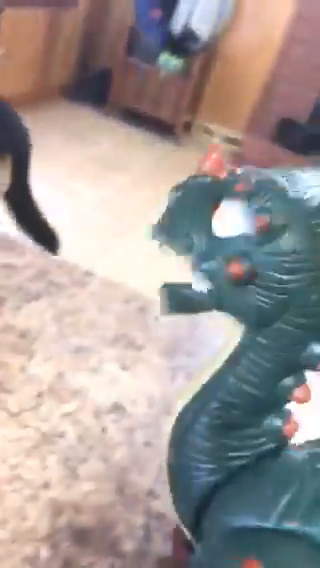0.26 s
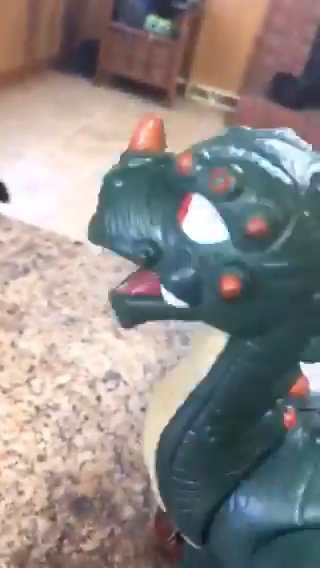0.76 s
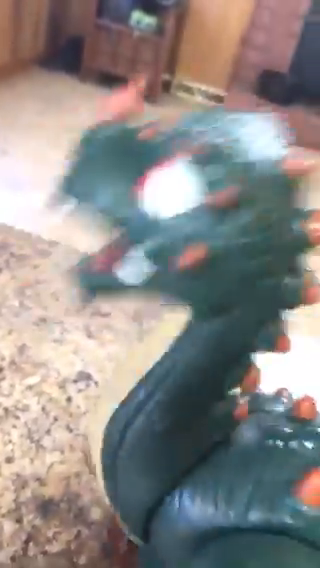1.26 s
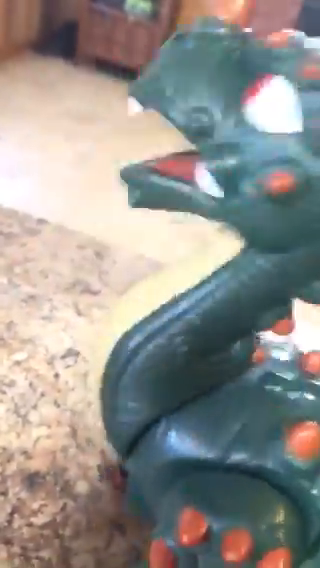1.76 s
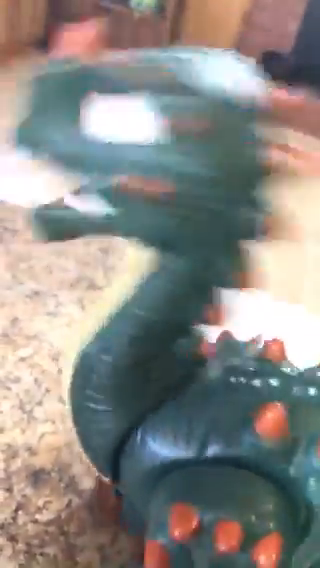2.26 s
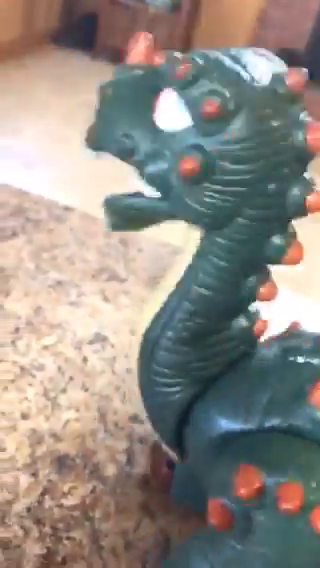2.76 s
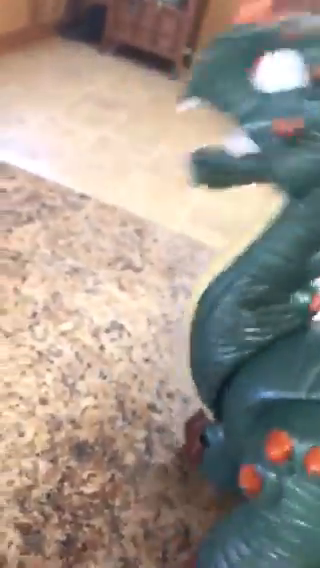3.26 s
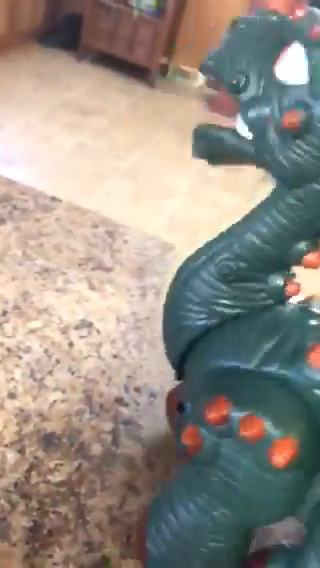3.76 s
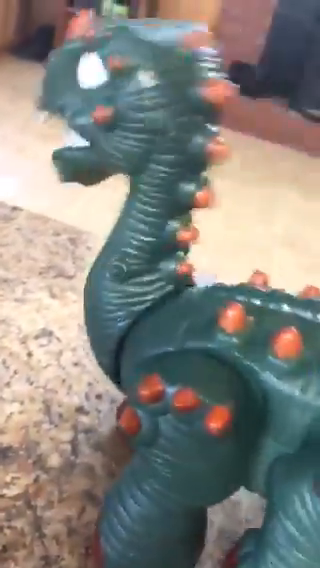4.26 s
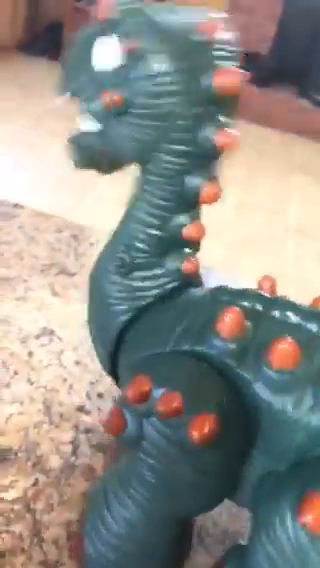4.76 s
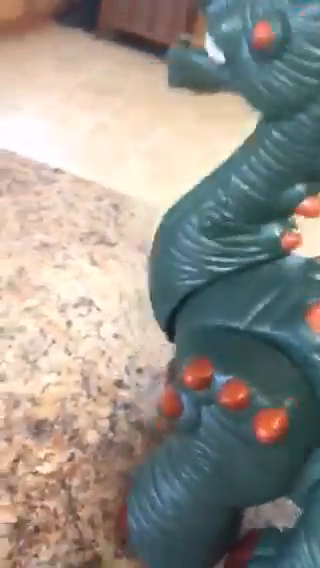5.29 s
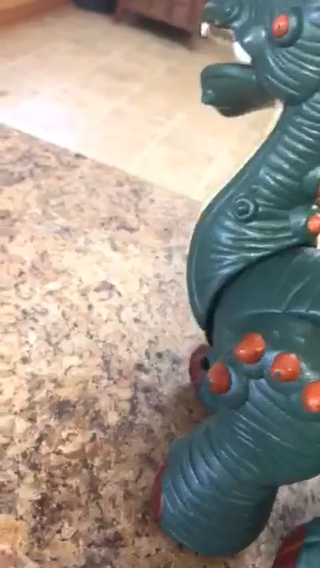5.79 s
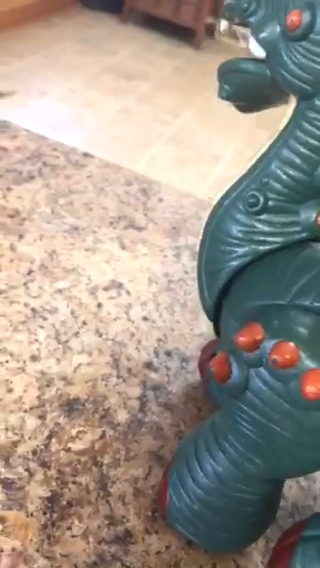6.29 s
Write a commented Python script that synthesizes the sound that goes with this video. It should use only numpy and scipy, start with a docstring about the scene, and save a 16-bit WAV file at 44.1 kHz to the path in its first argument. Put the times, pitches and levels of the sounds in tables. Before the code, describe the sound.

Close, irregular plastic clacking and joint clicking from a toy dinosaur stepping along a kitchen counter, ending in quiet hiss.

```python
"""A hollow plastic walking toy clacks along a stone kitchen counter, close to a phone.
Each step is a foot blow followed by bounces, joint clicks and faint chance ticks; the shell rings briefly,
the kitchen answers, a soft thud sounds far off, and the phone's gain recovers in the quiet."""
import sys
import numpy as np
from scipy import signal
from scipy.fft import rfft, irfft, next_fast_len
from scipy.io import wavfile
from scipy.ndimage import uniform_filter1d

SR = 44100
rng = np.random.default_rng(int(sys.argv[2]) if len(sys.argv) > 2 else 0)


def bounce(signal):
    """Save signal as a 16-bit WAV file at the path given by the first command-line argument."""
    frames = np.transpose(np.atleast_2d(signal))
    limited = np.clip(frames, -1, 1)
    pcm = np.round(limited * 32767).astype(np.int16)
    wavfile.write(sys.argv[1], SR, pcm)


N = 287973

# feet and limbs meeting counter and shell: (s, clack dB, snap dB over clack, hollow knock dB over clack)
CONTACTS = [(0.078, -26, -3, -7.5), (0.1252, -14.5, -2.5, 3.5), (.146, -13, -2.5, 0), (0.181, -29, 3, -18),
            (.325, -13.5, -12, -6), (.333, -9.5, -3.5, -1.5), (.353, -13.5, 1, -5.5), (0.537, -11, -2, 0), (.556, -15.5, -3.5, -0.5),
            (0.5891, -24, -4, -17), (0.6358, -27.5, -5, -4), (0.667, -30, -5, 4), (.6903, -39.5, -9, 9),
            (0.7395, -39, 1.5, 8.5), (0.7924, -8, -2, -2), (.8124, -23, 11, 2.5), (.846, -35, -6, 10), (.9353, -24, -6, 7.5),
            (.9781, -25.5, -5, 4.5), (1.0173, -15.5, -2, -6.5), (1.1098, -31.5, -3, -2), (1.1413, -28.5, -2, -3),
            (1.191, -9.5, -2, -3.5), (1.2221, -21.5, 3.5, 1.5), (1.3343, -38.5, 9, 10), (1.3404, -19, 0.5, 5.5),
            (1.3811, -20.5, -1.5, 6), (1.441, -24.5, -15, -18), (1.5523, -15, -16, -5), (1.561, -11.5, -4, -4),
            (1.754, -14, -2.5, 5.5), (1.787, -19.5, -3, 0), (1.807, -27.5, 7, -20), (1.828, -25, -10, -11),
            (1.93, -30.5, -7, 4), (1.939, -13.5, -6.5, -7.5), (1.9454, -19.5, -3, -.5), (1.972, -22.5, -0.5, 1),
            (2.154, -11.5, -1.5, 3), (2.1661, -13.5, -11, -3), (2.183, -19, -2, 0.5), (2.349, -16, -1.5, -4.5),
            (2.5448, -13, -2, 4.5), (2.5786, -20.5, -1.5, -5), (2.613, -26.5, -7, -21), (2.7279, -27.5, -16, -7),
            (2.7414, -20.5, -1.5, 0.5), (2.79, -31.5, 2.5, 0), (2.805, -31, -8, -12), (2.85, -41.5, -2, 10),
            (2.9353, -13.5, -1.5, 4), (2.9666, -23, -10, -5), (3.0047, -22, 7, -20), (3.1145, -56, 19, -17),
            (3.15, -25.5, -21, -4.5), (3.1669, -21, -5.5, 1), (3.1959, -33, -4, 4), (3.3561, -16, -3.5, 3.5),
            (3.402, -24.5, -9, 5.5), (3.442, -24, -8, -27), (3.534, -30, -11, -28), (3.5593, -18, -6.5, -1.5),
            (3.6162, -51, 15, 14), (3.7695, -14, -1, 3.5), (3.815, -27, -2, 3), (3.8515, -29.5, -15, -2), (3.9531, -30, -16, 3.5),
            (3.974, -33.5, -4, 5.5), (3.989, -32, -1.5, -2), (4.0358, -45.5, -19, 18), (4.1226, -37, -6, -6),
            (4.1425, -39.5, 0, 4), (4.2738, -21.5, -14, 0.5), (4.3458, -36.5, -4, -3), (4.5272, -12.5, -2.5, 4),
            (4.5455, -19, -6, 3), (4.7148, -22, 0, -6), (4.725, -12, -5.5, -2), (4.7887, -30, -1, -18),
            (4.891, -16.5, -2.5, 6.5), (4.91, -24.5, 7.5, -6), (4.9175, -19, -20, -10), (5.0547, -44, 8, -14),
            (5.2545, -40.5, 1, -1), (5.2854, -25.5, -12, 5), (5.3376, -26.5, -11, -9), (5.3728, -44, 14.5, -10),
            (5.4609, -22, -10, -5), (5.4688, -33, -5, 12), (5.499, -22, -8, -14), (5.811, -44, -43, 10)]
# hollow body of the toy: (Hz, width Hz, dB)
HOLLOW = [(546.5, 37, -6.5), (686.5, 31.5, 5), (784, 52, 2.5), (987, 70, 2.5), (1158, 86, -3), (1360, 150, -9)]
# stiff walls of the shell: (Hz, width Hz, dB)
WALLS = [(1384, 156, -5), (1830, 156, -2), (2247, 176, -2.5), (2905, 266, -2), (3410, 480, -3.5), (4200, 580, -3), (4910, 710, -12.5)]
JOINT = [(2880, 260, -3), (3160, 220, 0)]  # a small hard joint: (Hz, width Hz, dB)  # fixed
# thin edges that snap: (Hz, width Hz, dB)
EDGES = [(5540, 2000, -7.5), (6610, 780, -3.5), (8730, 2100, -10.5), (9520, 650, -11), (11410, 580, -14.5), (15300, 3900, -22.5)]
KITCHEN = [(100, 0.6), (400, 0.36), (1000, 0.54), (3000, 0.42), (7000, 0.36), (15000, 0.23)]  # (Hz, t60 s)
THUD = [(6.11, -36), (6.159, -47), (6.482, -52)]  # soft far steps: (s, dB)
THUD_MODES = [(149.5, 26, 17.5), (185, 48, 18), (220, 38, 19.5)]  # (Hz, width Hz, dB)
QUIET = [(15, -48), (25, -14), (64, -3), (170, -0.5), (363, -5.5), (439, -9.5), (591, -13), (659, -12), (1370, -18.5),
         (3250, -15.5), (5000, -17), (7110, -17.5), (10400, -22.5), (12500, -19.5), (16000, -24)]  # room hum and microphone hiss: (Hz, dB per Hz)
QUIET_DB = -48.5
LEAD = SR // 10  # samples sounding before the start  # fixed
TOP_HZ = 15900  # fixed
# the counter and cabinet under the feet: (Hz, width Hz, dB)
COUNTER = [(46, 38, -23), (77.7, 7.5, -12.5), (155.3, 43, -10.5), (271.3, 61, -6), (340.3, 28.6, -4), (380.4, 27, -0.5), (456.3, 74, -5)]
FAR = [(100, -1.5), (300, -7), (520, -1), (740, -7), (1050, -10), (1500, -5.5), (2400, -9.5), (3150, -8.5), (4200, -11), (7000, -13), (15000, -16)]  # strength of the kitchen's answer: (Hz, dB)
HUM = (67, 11, -59.5)  # a wavering appliance hum: (Hz, width Hz, dB)
BELLY = [(700.2, 56, -5.5), (772.5, 20, 0.5)]  # air in the belly, which lingers: (Hz, width Hz, dB)
CONTACT_RING_DB = -11  # the joint rings faintly under every clack
# the hard joint clicking as a leg swings: (s, ring dB, clack dB over ring, snap dB over ring)
JOINT_CLICKS = [(-.06, -12, 2, -1.5), (0.0883, -22, -5, -20), (0.0973, -23, -12, -26), (0.2193, -20, -4, -6.5),
                (.3064, -10.5, -5.5, 0), (0.7709, -7.5, -3.5, -3), (1.1644, -14, 0.5, 1), (1.533, -18, -1.5, 1.5),
                (1.5928, -27, 5.5, 6), (1.7804, -25, 3, -1), (1.9123, -14, -5.5, 1), (2.201, -19, -22, -14),
                (2.309, -15, -9.5, -1.5), (2.3408, -23.5, 7, 2.5), (2.4972, -41, 0, -12), (2.6474, -33, -8, -16),
                (2.7052, -13, -11, -6.5), (2.9991, -35, -17, 7), (3.1282, -19.5, -0.5, -1), (3.5059, -22, -1.5, -2.5),
                (3.5948, -22.5, -0.5, -14), (3.7585, -20.5, -9, -7), (3.9019, -27, -8, -6.5), (4.1703, -23, 1, -11),
                (4.207, -24, -1, -0.5), (4.5099, -20, -5, -7), (4.521, -12.5, -5, -23), (4.5536, -13.5, -10, -4),
                (4.6258, -25.5, -12, 0.5), (4.6929, -11, -5, -4), (4.7456, -18.5, -1, 5), (5.0642, -26.5, -13, -29),
                (5.2663, -32.5, -6, -15), (5.3158, -30, -13, -19), (5.4224, -8, -10, -8.5)]
CLICK_KNOCK_DB = -3.5  # hollow knock over the clack of a joint click
WALKING = [(0, 4.35), (4.55, 5.05), (5.25, 5.6)]  # the toy is in motion: (from s, to s)  # fixed
FAINT_DB, FAINT_DB_PER_S, FAINT_SPREAD_DB = -37, 0, 4.5  # chance ticks of the moving toy, at a steady average level with random spread
FAINT_MS = None
CHATTER_MS, CHATTER_MS_PER_KNOCK_DB, HEAVY_KNOCK_DB = 7.23, 0.05, -13.5  # a heavier knock chatters longer
PINGS = [(2.6135, -30), (2.805, -38), (3.4422, -19), (4.2085, -21)]  # a small part pings high: (s, dB)
PING_MODES = [(4570, 350, -3), (4880, 370, -2)]  # (Hz, width Hz, dB)


def amp(db):
    """Decibels to gain."""
    return 10 ** (np.asarray(db) / 20)


def along(points, hz):
    """(Hz, value) points on a log axis."""
    f, v = np.transpose(points)
    return np.interp(np.log(hz + 1), np.log(f + 1), v)


def filtered(x, response):
    """x times a complex response of frequency."""
    m = next_fast_len(x.shape[-1] + 8192)  # fixed
    return irfft(rfft(x, m) * response(np.fft.rfftfreq(m, 1 / SR)), m)[..., :x.shape[-1]]


def struck(force, modes, db, scatter_db, detune):
    """Rows of force through resonances, whose strengths and pitches differ from blow to blow."""
    f = np.fft.rfftfreq(force.shape[1], 1 / SR)
    chance = rng.standard_normal((len(force), len(modes), 2))
    body = 0
    for k, (hz, width, level_db) in enumerate(modes):
        c = hz * (1 + detune * chance[:, k, :1])
        body = body + (-1) ** k * amp(level_db + scatter_db * chance[:, k, 1:]) * 1j * f * width / (c * c - f * f + 1j * f * width)
    ring = irfft(rfft(force) * body)
    strongest = uniform_filter1d(ring ** 2, size=100, axis=1).max(1)
    return ring * (amp(db) / np.sqrt(strongest))[:, None]


def chatter(length_ms, spikes, spiky_db, rise_ms, edge):
    """Force of each contact: a burst of tiny rebounds of uneven size that holds, then dies away."""
    t_ms = np.arange(spikes.shape[1]) / SR * 1000  # fixed
    fade = np.exp(-(t_ms / np.clip(length_ms, .3, 20)[:, None]) ** edge) * (1 - np.exp(-t_ms / rise_ms))
    return rng.standard_normal(spikes.shape) * amp(spiky_db * spikes) * fade


def toy(rows):
    """Rows of body sound and of joint ring, one for each contact; all parts feel the same rebounds."""
    _, db, snap_db, knock_db, ring_db = np.transpose(rows)
    length_ms = np.maximum(CHATTER_MS + CHATTER_MS_PER_KNOCK_DB * (knock_db - HEAVY_KNOCK_DB), 2.5)
    spikes = uniform_filter1d(rng.standard_normal((len(db), 8192)), size=36, axis=1) * 6  # fixed
    force = lambda share, spiky_db, rise_ms=.15: chatter(share * length_ms, spikes, spiky_db, rise_ms, edge=0.79)
    clack = struck(blow(force(0.79, spiky_db=4), sharp=0.32), WALLS, db - 1.5, scatter_db=2.5, detune=0.036)
    ring = struck(blow(force(.35, spiky_db=4), sharp=1.3), JOINT, ring_db - 1.5, scatter_db=3, detune=.03)  # fixed
    snap = struck(blow(force(0.83, spiky_db=6.5), sharp=0.29), EDGES, snap_db, scatter_db=1.5, detune=0.046)
    knock = struck(blow(force(.55, spiky_db=4), sharp=2), HOLLOW, knock_db, scatter_db=1.5, detune=.012)  # fixed
    boom = struck(blow(force(1.73, spiky_db=2.0, rise_ms=0.99), sharp=0.95), COUNTER, knock_db - 11, scatter_db=1.5, detune=0.014)
    rattle = struck(loose(count=len(db), per_s=120, fade_ms=21.8, tick_ms=2.15), WALLS + EDGES, db - 5.5, scatter_db=6.5, detune=0.071)
    belly = struck(force(1.3, spiky_db=2.0, rise_ms=1.4), BELLY, knock_db - 13.5, scatter_db=7, detune=0.016)
    return clack + snap + knock + boom + belly + rattle, ring


def kitchen(count):
    """Reverberant tails of energy 1; each frequency dies at its own speed."""
    hz, t, z = signal.stft(rng.standard_normal((count, SR // 2)), SR, nperseg=256)
    tails = signal.istft(z * amp(-60 * t / along(KITCHEN, hz)[:, None]), SR, nperseg=256)[1]
    tails = tails * (1 - np.exp(-np.arange(tails.shape[1]) / (0.00067 * SR)))  # echoes take a moment to build up
    return tails / np.linalg.norm(tails, axis=1, keepdims=True)


def walk():
    """The toy moves as it walks, so successive contacts excite the room in different ways."""
    places = np.zeros((12, LEAD + N + 8192))  # fixed
    near = np.zeros(places.shape[1])
    rows = contacts()
    for k, (row, body, ring) in enumerate(zip(rows, *toy(rows))):
        at = slice(LEAD + round(row[0] * SR), LEAD + round(row[0] * SR) + len(body))
        near[at] += body + ring
        places[k % len(places), at] += body + amp(-9) * ring  # the joint faces the phone and sends little to the walls  # fixed
    wet = signal.fftconvolve(places, kitchen(count=len(places)), axes=1).sum(0)
    return near[LEAD:LEAD + N] + filtered(wet[LEAD:LEAD + N], lambda hz: amp(along(FAR, hz)))


def thuds():
    """Soft pushes on the floor ring its low modes."""
    t = np.arange(16384) / SR  # fixed
    push = np.exp(-t / 0.037) * uniform_filter1d(rng.standard_normal((len(THUD), len(t))), size=110, axis=1)
    out = np.zeros(N + len(t))
    for (s, _), sound in zip(THUD, struck(push, THUD_MODES, np.transpose(THUD)[1], scatter_db=0.0, detune=.012)):
        out[round(s * SR):][:len(t)] += sound
    return out[:N]


def quiet():
    """Steady rumble and hiss, with a narrow hum."""
    noise = filtered(rng.standard_normal(N), lambda hz: amp(along(QUIET, hz)))
    centre_hz, width_hz, hum_db = HUM
    hum = filtered(rng.standard_normal(N), lambda hz: np.exp(-((hz - centre_hz) / width_hz) ** 2))
    return amp(QUIET_DB) * noise / noise.std() + amp(hum_db) * hum / hum.std()


def loose(count, per_s, fade_ms, tick_ms):
    """Force of loose parts that go on ticking at random, ever weaker, after a contact."""
    t_ms = np.arange(8192) / SR * 1000  # fixed
    chance = rng.random((count, 2, len(t_ms)))
    starts = (chance[:, 0] < per_s / SR) * chance[:, 1] * np.exp(-t_ms / fade_ms)
    starts[:, 0] = 1
    ticks = signal.lfilter([1], [1, -np.exp(-1000 / (tick_ms * SR))], starts)
    return ticks * rng.standard_normal(ticks.shape)


def blow(force, sharp):
    """Chatter led by one clean impulse, which strikes every mode alike."""
    first = np.arange(force.shape[1]) == 8  # fixed
    return force / np.linalg.norm(force, axis=1, keepdims=True) + sharp * first


def contacts():
    """All contacts as rows (s, clack dB, snap dB, knock dB, ring dB)."""
    rows = [(s, db, db + snap, db + knock, db + CONTACT_RING_DB) for s, db, snap, knock in CONTACTS]
    rows += [(s, db + clack, db + snap, db + clack + CLICK_KNOCK_DB, db) for s, db, clack, snap in JOINT_CLICKS]
    return np.array(sorted(rows) + faint(per_s=6))  # fixed


def faint(per_s):
    """Small chance ticks while the toy moves, each with its own mix of parts."""
    rows = []
    for start, end in WALKING:
        for slot in np.arange(start, end - .5 / per_s, 1 / per_s):
            s = slot + rng.random() / per_s
            clack, snap, knock, ring = FAINT_DB + FAINT_DB_PER_S * s + FAINT_SPREAD_DB * rng.standard_normal(4)
            rows.append((s, clack, snap - 6, knock + 3, ring - 5))
    return rows


def pings():
    """Short bright rings of a small stiff part."""
    t = np.arange(2048) / SR  # fixed
    force = blow(rng.standard_normal((len(PINGS), len(t))) * np.exp(-t / 0.0027), sharp=.8)
    out = np.zeros(N + len(t))
    for (s, _), sound in zip(PINGS, struck(force, PING_MODES, np.transpose(PINGS)[1], scatter_db=2, detune=.015)):  # fixed
        out[round(s * SR):][:len(t)] += sound
    return out[:N]


def scene():
    """Toy, far thuds and the room's quiet."""
    return (walk() + pings() + thuds() + quiet())[None]


def record(dry):
    """Slow gain control turns down after loud passages; nothing is kept above the band limit."""
    hold = np.exp(-1 / (.4 * SR))
    power = signal.lfilter([1 - hold], [1, -hold], dry ** 2, zi=[[.002]])[0]
    gain_db = -.15 * np.clip(10 * np.log10(power + 1e-12) + 48, 0, 40)
    loud = dry * amp(gain_db)
    rounded = loud / (1 + np.abs(loud / .8) ** 4) ** (1 / 4)  # the highest peaks are rounded off  # fixed
    return filtered(rounded, lambda hz: 1 / (1 + (hz / TOP_HZ) ** 90))  # fixed


dry = scene()
out = record(dry)
bounce(out)
```